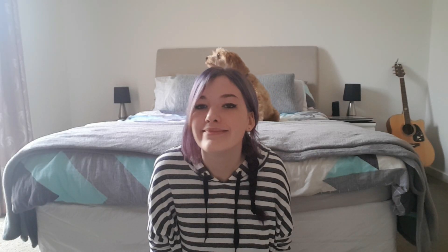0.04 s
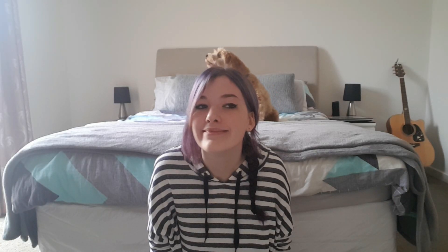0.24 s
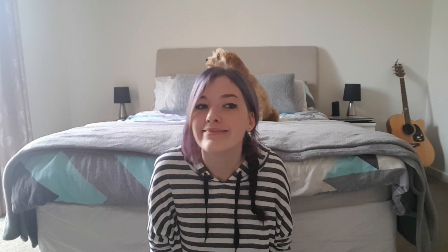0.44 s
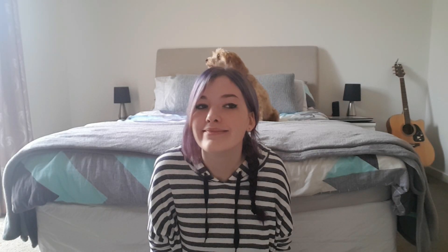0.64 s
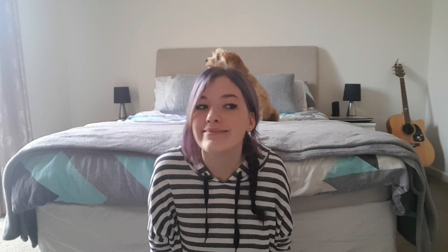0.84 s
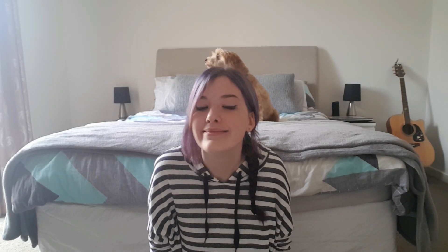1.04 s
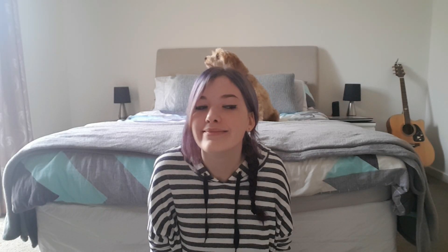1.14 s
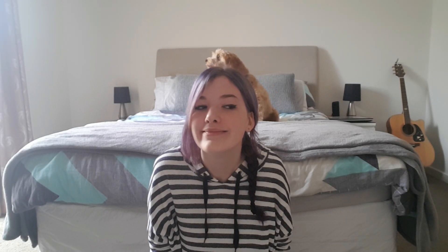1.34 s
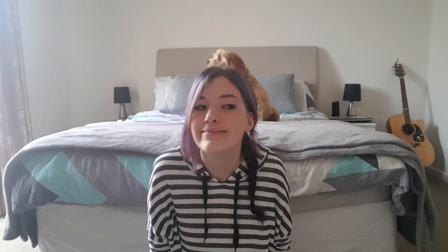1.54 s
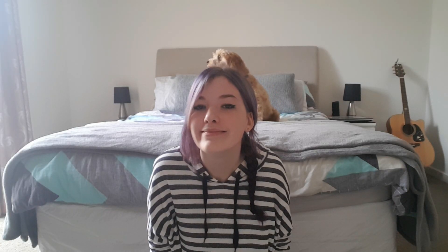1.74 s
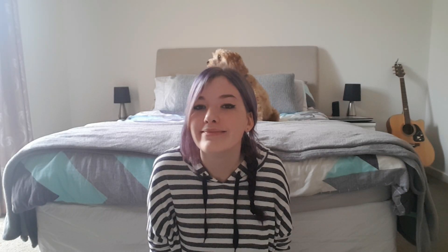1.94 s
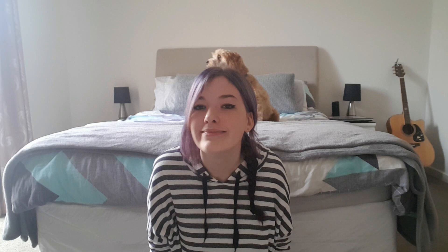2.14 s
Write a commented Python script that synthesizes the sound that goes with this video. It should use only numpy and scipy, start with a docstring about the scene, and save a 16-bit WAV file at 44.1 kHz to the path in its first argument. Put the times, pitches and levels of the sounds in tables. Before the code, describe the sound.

Two gruff barks from a small dog, about a second apart, each led in by a rattling growl. The bedroom answers with a short tail; a soft breathy hiss follows the second, over very quiet room noise.

```python
"""A small dog barks twice in a bedroom; each bark swells out of a low, rattling growl.
Uneven throat pulses, puffs of air and a clean tone make the barks; their pitch arches up and sinks back.
Slow throat flaps through fixed resonances make the growls, and a short knock starts the second one.
The room answers with a short noise tail and narrow rings. A soft hiss trails the second bark,
over a faint steady hiss and a wavering low hum."""
import sys
import numpy as np
from scipy import signal
from scipy.fft import rfft, irfft, next_fast_len
from scipy.io import wavfile
from scipy.ndimage import uniform_filter1d, minimum_filter1d

SR = 44100
rng = np.random.default_rng(int(sys.argv[2]) if len(sys.argv) > 2 else 0)


def store_pcm(level_fs):
    """Save levels as 16-bit WAV."""
    pcm = np.round(np.clip(level_fs, -1, 1) * 32767).astype(np.int16)
    wavfile.write(sys.argv[1], SR, np.atleast_2d(pcm).T)


N = 97020  # length of the scene in samples

# How alike left and right are: pitch_hz, likeness (1 same, 0 unrelated, below 0 opposed)
LEFT_RIGHT_LIKENESS = [(50, 0.79), (250, 0.96), (500, .55), (1000, 0.024), (2500, -0.046), (6000, -.15),
                       (15000, -0.3)]


def amp(db):
    """Turns decibels into a gain."""
    return 10 ** (np.asarray(db) / 20)


def evened(x):
    """Scales a signal to an average strength (rms) of 1."""
    return x / np.sqrt(np.mean(x ** 2) + 1e-20)


def read(points, hz):
    """Reads a table of (pitch_hz, value) between its points, on a log-frequency axis."""
    point_hz, value = np.transpose(points)
    return np.interp(np.log(hz + 1), np.log(point_hz + 1), value)


def colour(x, points):
    """Makes each frequency louder or softer by a table of (pitch_hz, level_db)."""
    size = next_fast_len(x.shape[-1] + SR // 4)
    gain = amp(read(points, np.fft.rfftfreq(size, 1 / SR)))
    return irfft(rfft(x, size) * gain, size)[..., :x.shape[-1]]


def wobble(rate_hz):
    """Smooth random movement of rms 1, which gets weak above the given rate."""
    keep = np.exp(-(np.fft.rfftfreq(N, 1 / SR) / rate_hz) ** 2)
    return evened(irfft(rfft(rng.standard_normal(N)) * keep, N))


def resonate(x, hz, width_hz):
    """A steep resonance of gain 1 that follows the curve hz."""
    turn = np.exp(2j * np.pi * np.cumsum(hz) / SR)
    r = np.exp(-np.pi * width_hz / SR)
    # shift the resonance down to 0 Hz, smooth twice, then shift it back
    smooth = signal.lfilter([(1 - r) ** 2], [1, -2 * r, r * r], x / turn + 1e-18)
    return 2 * (turn * smooth).real


def pair(two):
    """Turns two unrelated signals into a diffuse field at two close microphones."""
    size = two.shape[-1]
    alike = np.clip(read(LEFT_RIGHT_LIKENESS, np.fft.rfftfreq(size, 1 / SR)), -1, 1)
    mid, side = rfft(two) * np.sqrt([(1 + alike) / 2, (1 - alike) / 2])
    return irfft(np.array([mid + side, mid - side]), size)


def bark(curve, hiss_db):
    """Uneven fold pulses and puffs of air pass the opening throat, beside a clean fundamental."""
    jitter, tone_flutter_db = .13, 4.5  # both act in full only where the voice is most ragged
    tone_waver, shimmer_db = .02, 3  # steady share of pitch waver, and loudness waver
    clear_range, growl_mouth = .3, 0.51  # mouth openings that bound the ragged part
    t = np.arange(N) / SR
    times, *columns = np.transpose(curve)
    hz, tone_db, rasp_db, mouth, rough = (np.interp(t, times, c) for c in columns)
    mouth, rough = np.clip(mouth, 0, 1.1), np.clip(rough, 0, 1)
    sounding = np.clip((times[-1] - t) / .01, 0, 1) * np.clip((t - times[0]) / .004, 0, 1)

    # the pitch breaks up between growl and full cry
    below_full_cry = np.clip((1 - mouth) / clear_range, 0, 1)
    ragged = below_full_cry * np.clip(mouth / growl_mouth, .3, 1)
    turns = np.cumsum(hz * (1 + (tone_waver + jitter * ragged) * wobble(110))) / SR

    # one pulse per turn; the air is strongest at the start of each turn
    pulses = np.diff(np.floor(turns), prepend=0) * np.sqrt(SR / hz)
    puffs = evened(.5 + np.exp(-(turns % 1) / .3)) * rng.standard_normal(N)
    shimmer = evened(amp(shimmer_db * wobble(170)))
    rasp = np.sqrt(1 - rough) * pulses + np.sqrt(rough) * puffs
    drive = rasp * shimmer * amp(rasp_db) * sounding

    flutter_db = (1.5 + tone_flutter_db * ragged) * (np.clip(wobble(100), -3, 1.5) - .3)
    tone = np.sqrt(2) * np.cos(2 * np.pi * turns) * amp(tone_db + flutter_db) * sounding
    return throat(drive, hz, mouth, hiss_db) + tone


def throat(drive, pitch, mouth, hiss_db):
    """Resonances rise and brighten as the mouth opens; little passes well below the pitch."""
    # Throat resonances: shut_hz, open_hz, width_hz, shut_db, open_db
    resonances = [(301, 680, 250, 8, 3.5), (830, 1053, 146.5, -5, 19), (1151, 1400, 240, -29, -4.5),
                  (1600, 1700, 170, -28, 3.5), (1900, 2020, 150, -57, -7), (2500, 2652, 130, -48.5, 3)]
    # Broad hiss of the open mouth: pitch_hz, level_db (before hiss_db and mouth opening)
    mouth_hiss = [(100, -24.5), (300, -14), (700, -12.5), (1350, -12), (2050, -19.5), (2350, -24.5),
                  (2900, -17.5), (3200, -38.5), (3800, -31.5), (5300, -41.5), (6600, -35.5), (7600, -47),
                  (8600, -36), (9800, -51.5), (11000, -42.5), (13000, -54), (15700, -50)]
    hiss_shut_db = -35.5  # change of the hiss when the mouth is shut
    low_cut_share, low_cut_slope = .6, 4.6  # cut-off as a share of the pitch, and its steepness
    hz, at, z = signal.stft(drive, SR, nperseg=512, noverlap=448)
    hz = hz[:, None]
    pitch, mouth = (np.interp(at, np.arange(N) / SR, c) for c in (pitch, mouth))
    gain = amp(read(mouth_hiss, hz) + hiss_db + hiss_shut_db * (1 - mouth))
    for shut_hz, open_hz, width_hz, shut_db, open_db in resonances:
        off = (hz - shut_hz - (open_hz - shut_hz) * mouth) / width_hz
        peak = amp(shut_db + (open_db - shut_db) * mouth)
        gain = gain + peak / (1 + 2 * off ** 2) ** 2
    gain = gain / (1 + (low_cut_share * pitch / (hz + 1)) ** low_cut_slope)
    return signal.istft(z * gain, SR, nperseg=512, noverlap=448)[1][:N]


def growl(start_s, end_s, rate_hz, start_db, end_db):
    """Slow, slightly uneven flaps of the throat swell behind a closed mouth."""
    # The closed throat while growling: pitch_hz, width_hz, level_db
    closed_throat = [(144, 28, -1), (224, 100, 2), (311, 58, 4), (615, 110, -13.5), (855, 45, -20),
                     (1740, 100, -37)]
    rattle = .28  # amount of noise beside the flaps
    low_hz, top_hz = 80.06, 430  # weaker below low_hz, with a dip at top_hz
    t = np.arange(N) / SR
    on = (t >= start_s) & (t < end_s)
    turns = np.cumsum(on * rate_hz * (1 + 0.036 * wobble(60))) / SR
    flaps = np.diff(np.ceil(turns), prepend=0) * np.sqrt(SR / rate_hz)
    swell = amp(np.interp(t, [start_s, end_s], [start_db, end_db]))
    drive = (flaps + rattle * rng.standard_normal(N)) * on * swell
    voiced = sum(amp(db) * resonate(drive, np.full(N, hz), width_hz)
                 for hz, width_hz, db in closed_throat)
    shape = [(low_hz / 2, -24), (low_hz, 0), (.85 * top_hz, 1), (top_hz, -7), (2 * top_hz, 0)]
    return colour(voiced, shape)


def catch():
    """A short damped knock: the small catch in the throat that starts the second growl."""
    start_s, pitch_hz, level_db = 1.071, 624.8, -49  # level before the dog's overall gain
    t60_s = .09  # time to die away by 60 dB
    t = np.maximum(np.arange(N) / SR - start_s, 0)
    fade = amp(level_db - 60 * t / t60_s) * np.minimum(t / .003, 1)
    return fade * np.sin(2 * np.pi * pitch_hz * t)


def bedroom(x):
    """Dense reflections, strongest early on, each band dying at its own speed."""
    # How long the tail takes to die by 60 dB: pitch_hz, t60_s
    decay_times = [(100, 0.04), (300, 0.3433), (600, 0.4713), (1000, 0.386), (2000, 0.42), (4000, 0.5159),
                   (12000, 0.27)]
    # Tone of the tail: pitch_hz, level_db (before the room's overall gain)
    tail_colour = [(100, -6.5), (300, -6), (600, -4.5), (1000, -3), (2500, -3.5), (10000, 0.5)]
    gap_s, early_db, early_s = .003, 6.5, .025  # silence first, then a fading early boost
    t = np.arange(SR) / SR
    taps = rng.standard_normal((2, SR)) * (t > gap_s) * amp(early_db * np.exp(-t / early_s))
    hz, at, z = signal.stft(taps, SR, nperseg=256)
    z = z * amp(-60 * at / read(decay_times, hz)[:, None])
    # give all bands like energy, so that the colour table alone sets the tone
    energy = (abs(z) ** 2).sum(2).mean(0)
    z /= np.sqrt(uniform_filter1d(energy, size=3))[:, None]
    tail = signal.istft(z, SR, nperseg=256)[1][:, :SR]
    wet = signal.fftconvolve(x[None], tail / np.linalg.norm(tail[0]), axes=1)
    return colour(pair(wet), tail_colour)[:, :N]


def rings(x):
    """Narrow room resonances, set off by the dog, hang on in a different phase at each microphone."""
    # Rings of the room: pitch_hz, level_db (before the rings' overall gain), t60_s
    room_rings = [(257.7, -5.5, 0.35), (340.3, -7, 0.15), (399.7, -7.5, 0.099), (476, -6, 0.15),
                  (513.2, -7.5, 0.66), (549, -16, 1), (604, -2.5, .28), (629.5, -7, 0.58), (862, -10, 0.27),
                  (875, -19.5, .65), (942, -9.5, 0.62), (978, -3.5, 0.65), (1012, -3, 0.73),
                  (1011, -6.5, 0.69), (1115, -1.5, .62), (1180, -19.5, .85), (1174, -14, 0.84),
                  (1269.4, -8, .3), (1374, -5, 0.25), (1654, -4, 0.54), (1717, -5.5, .38), (2600, -7, .25),
                  (2654, -19.5, .62)]
    t, response = np.arange(SR) / SR, np.zeros((2, SR))
    for hz, db, t60_s in room_rings:
        # less alike means further apart in phase; which side leads is chance
        half_angle = np.arccos(np.clip(read(LEFT_RIGHT_LIKENESS, hz), -1, 1)) / 2
        apart = half_angle * rng.choice([-1, 1]) * np.array([[1], [-1]])
        steady_gain = 2 * np.log(1000) / (t60_s * SR)  # keeps long rings from growing louder
        response += amp(db - 60 * t / t60_s) * steady_gain * np.cos(2 * np.pi * hz * t + apart)
    return signal.fftconvolve(x[None], response, axes=1)[:, :N]


def after_hiss():
    """Soft wide-band noise rises as the second bark ends, then fades."""
    # Loudness of the hiss: time_s, level_db
    hiss_curve = [(1.27, -67), (1.38, -54.5), (1.48, -59.5), (1.66, -79)]
    # Tone of the hiss: pitch_hz, relative level_db
    hiss_colour = [(200, -20.5), (1500, 5.5), (3500, 1), (7000, -4), (15000, -9.5)]
    t = np.arange(N) / SR
    level_db = np.interp(t, *np.transpose(hiss_curve))
    on = (t > hiss_curve[0][0]) & (t < hiss_curve[-1][0])
    level_db = np.where(on, level_db, -np.inf)
    return evened(colour(pair(rng.standard_normal((2, N))), hiss_colour)) * amp(level_db)


def still_air():
    """Faint coloured noise and a low sine hum whose pitch wavers."""
    # Tone of the steady hiss: pitch_hz, relative level_db
    air_colour = [(15, -4), (40, -13), (90, -11), (170, -19.5), (280, -19), (600, -23), (2400, -26.5),
                  (6000, -37.5), (10000, -39.5), (15500, -35.5)]
    hiss_db, hum_db, hum_hz = -66.5, -65, 26
    hum = np.sqrt(2) * np.sin(2 * np.pi * np.cumsum(hum_hz * (1 + 0.018 * wobble(4))) / SR)
    hiss = evened(colour(pair(rng.standard_normal((2, N))), air_colour))
    return amp(hiss_db) * hiss + amp(hum_db) * hum


def scene():
    """The dog, heard directly and through the room, over the background."""
    # Each bark: time_s, pitch_hz, clean tone level_db, rasp level_db, mouth opening (0-1), roughness (0-1)
    # (levels before the gains below)
    first_bark = [(0, 100.2, -46.5, -41, 0, .6), (.1, 144.4, -43, -33.5, 0.05, .6),
                  (.168, 164.7, -34.5, -24.5, 0.1, 0.13), (.195, 270.3, -29, -14.5, 0.43, 0.54),
                  (.218, 345.6, -23.5, -8.5, .8, 0.08), (.232, 466.7, -13.5, -6, 0.93, 0.44),
                  (.258, 596.6, -13.5, -5.5, 1, .5), (.29, 627.8, -17, -6, 1, 0.88),
                  (.318, 598.7, -21.5, -4, 0.9, .7), (.35, 491.8, -34, -8, .8, .7),
                  (.385, 278.8, -36, -14, 0.8, 0.59), (.403, 149.2, -45.5, -20.5, 0.25, .5),
                  (.425, 131, -77, -43, 0.7, 0.42)]
    second_bark = [(1.05, 109.7, -68, -60.5, .1, .3), (1.08, 124.3, -58, -39, .25, .3),
                   (1.125, 135.4, -53, -34.5, 0.19, 0.27), (1.158, 164.8, -41, -23.5, 0.31, .3),
                   (1.182, 290.1, -26.5, -16.5, 0.45, .4), (1.203, 387.3, -19, -6.5, .82, 0.55),
                   (1.218, 479.5, -12, -10, 1, 0.45), (1.238, 599.2, -12, -8, 0.91, 0.42),
                   (1.266, 628, -12, -4, 1, 0.83), (1.3, 570.4, -23.5, -6.5, 0.9, 0.93),
                   (1.33, 390.3, -26, -7, .78, .7), (1.365, 279.4, -31, -13.5, .66, 0.72),
                   (1.395, 170, -54.5, -47.5, 0.45, 0.7)]
    # Growls: start_s, end_s, flaps per second, start_db, end_db (levels before the gains below)
    growls = [(0, .2, 52, -28, -23.5), (1.071, 1.188, 63, -33.5, -20.5)]
    barks = bark(first_bark, hiss_db=0.5) + bark(second_bark, hiss_db=2)
    dog = barks + amp(7) * sum(growl(*row) for row in growls) + catch()
    room = amp(-1.5) * bedroom(dog) + amp(3) * rings(dog)
    return amp(-4.0) * dog + room + after_hiss() + still_air()


def record(dry):
    """A quick limiter holds the highest peaks, then a low-pass filter removes the top treble."""
    ceiling, edge_hz = .98, 15800
    gain = np.minimum(1, ceiling / (abs(dry).max(0) + 1e-9))
    # dip a little before and after each peak, with smooth edges
    gain = minimum_filter1d(gain, size=401)
    gain = uniform_filter1d(uniform_filter1d(gain, size=201), size=201)
    low_pass = signal.firwin(511, edge_hz, window=("kaiser", 9), fs=SR)
    return signal.oaconvolve(dry * gain, low_pass[None], "same")


dry = scene()
out = record(dry)
store_pcm(out)
```